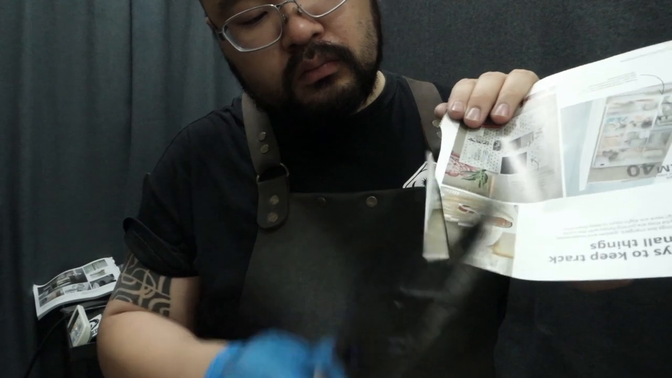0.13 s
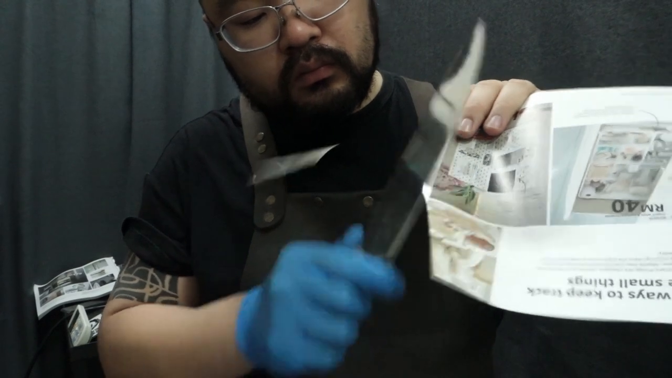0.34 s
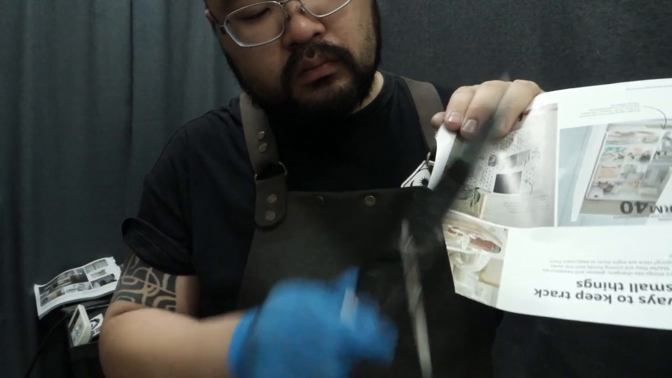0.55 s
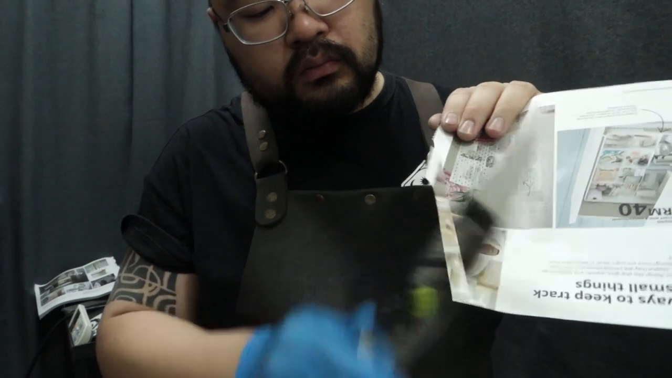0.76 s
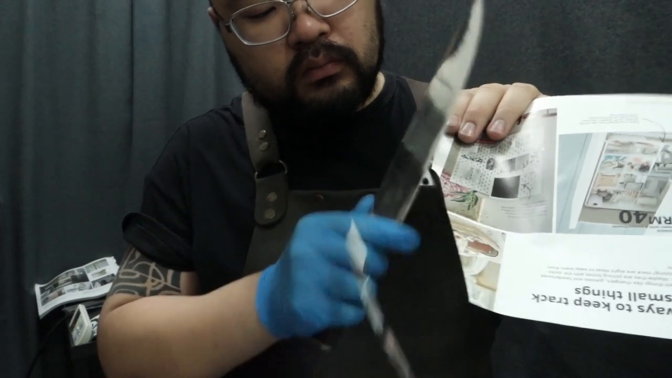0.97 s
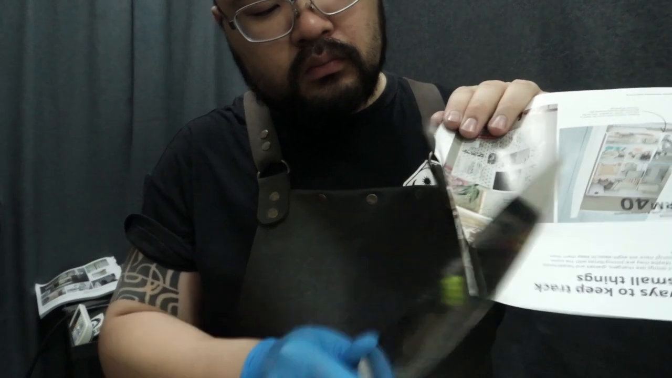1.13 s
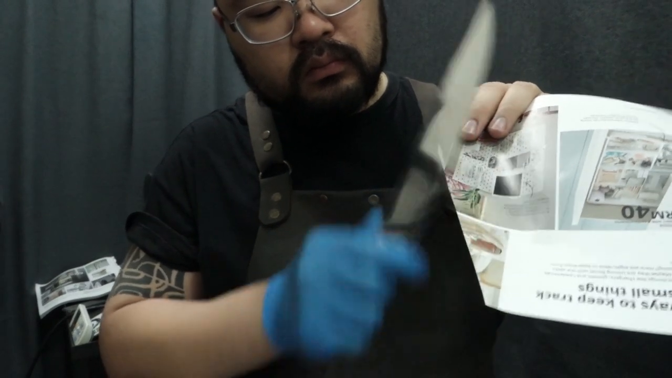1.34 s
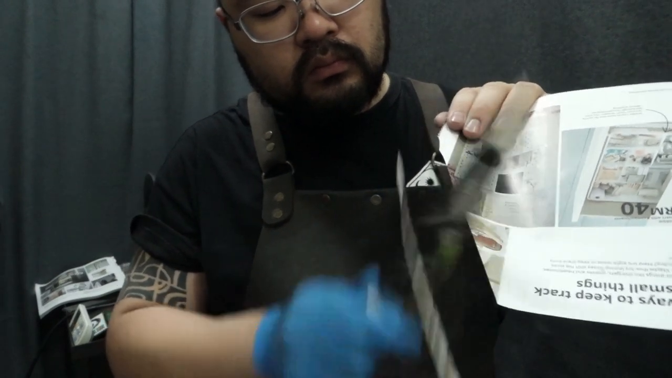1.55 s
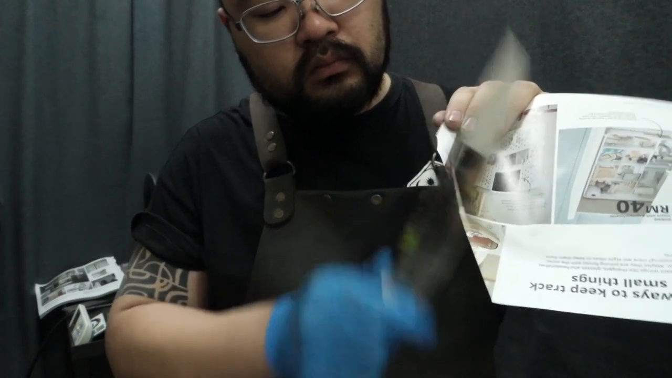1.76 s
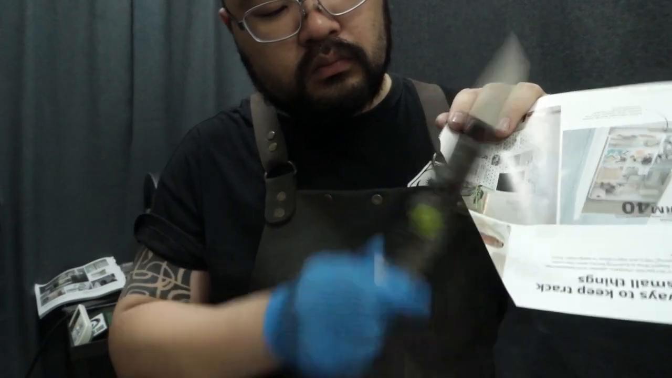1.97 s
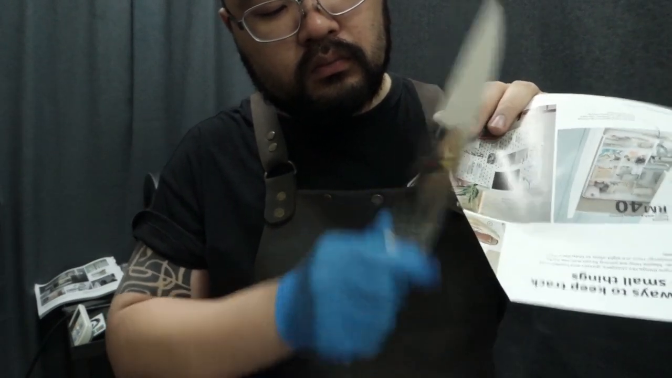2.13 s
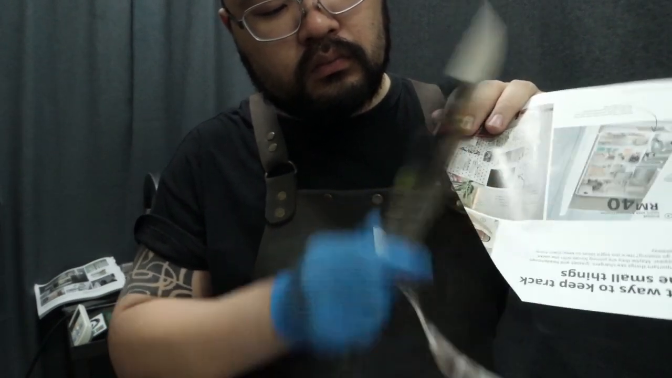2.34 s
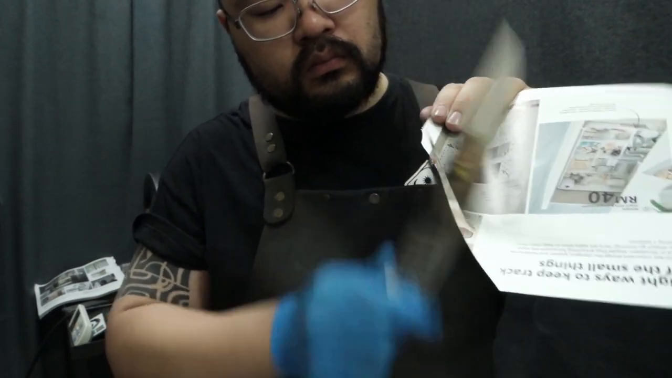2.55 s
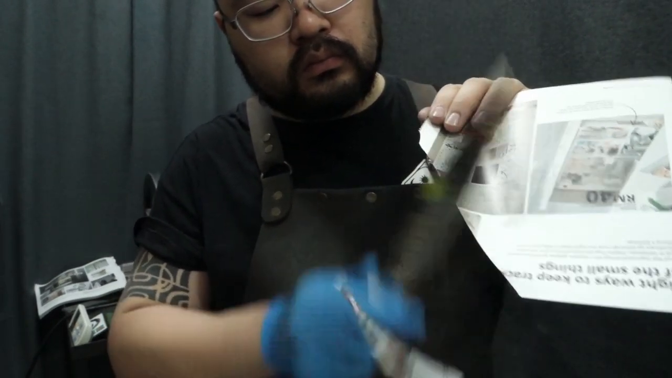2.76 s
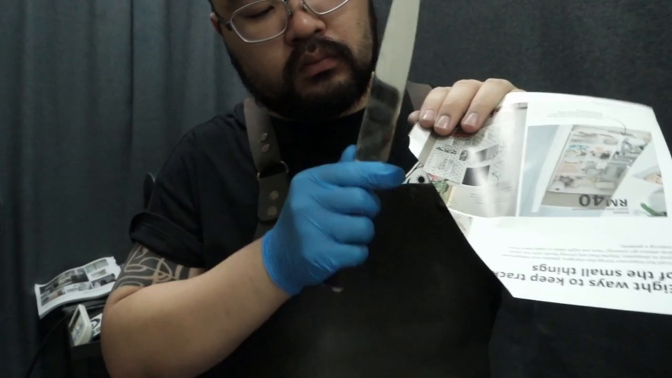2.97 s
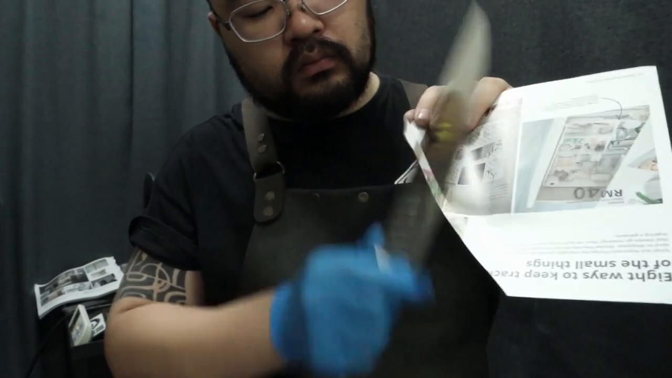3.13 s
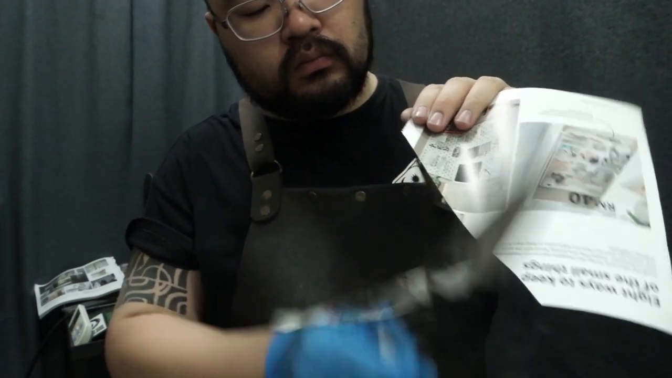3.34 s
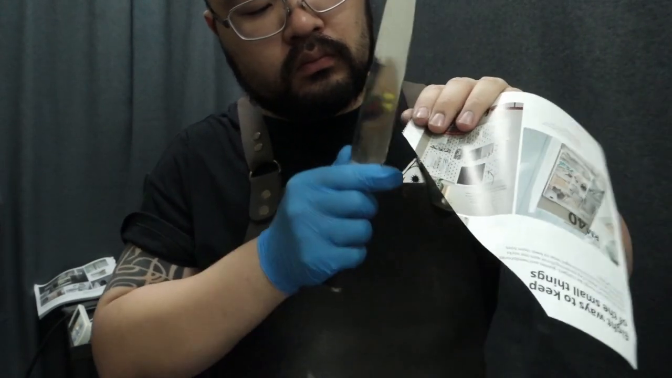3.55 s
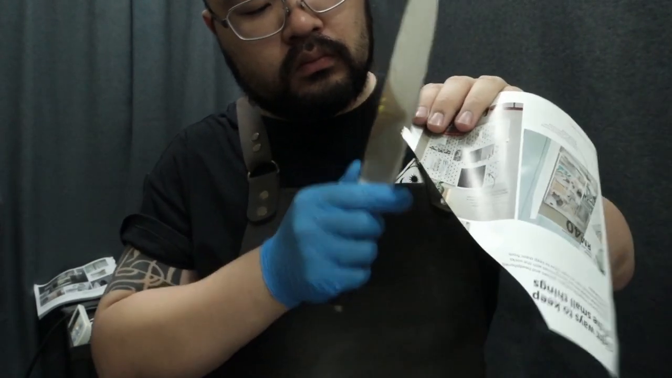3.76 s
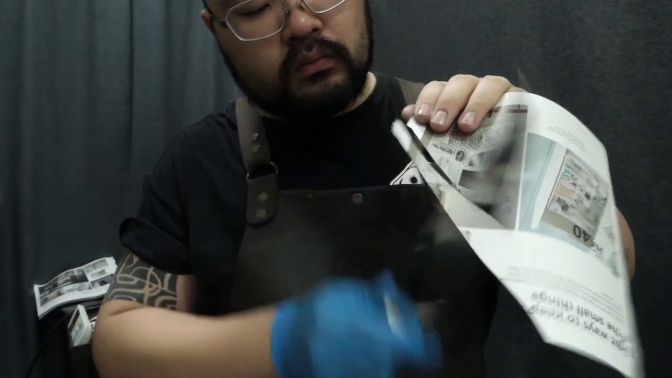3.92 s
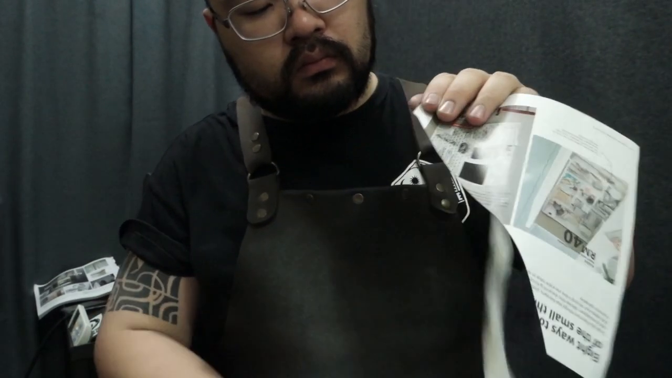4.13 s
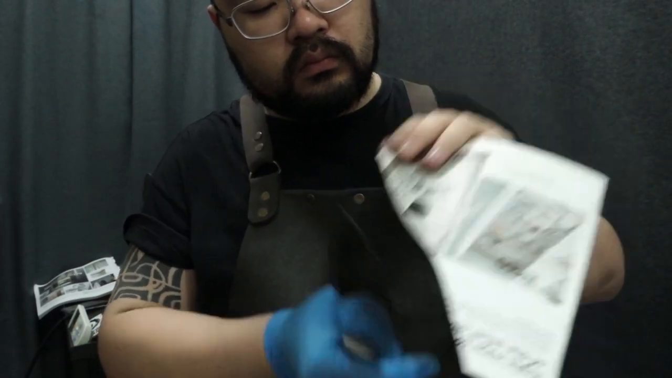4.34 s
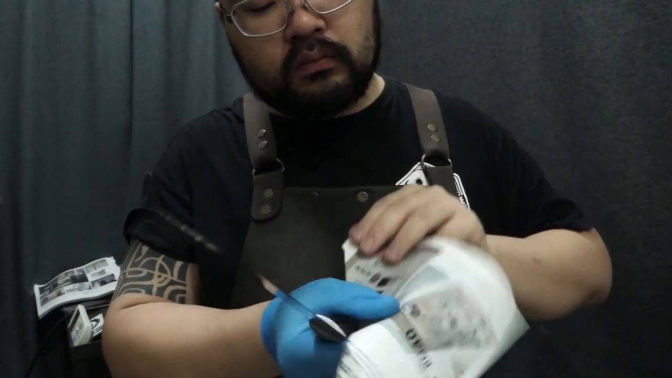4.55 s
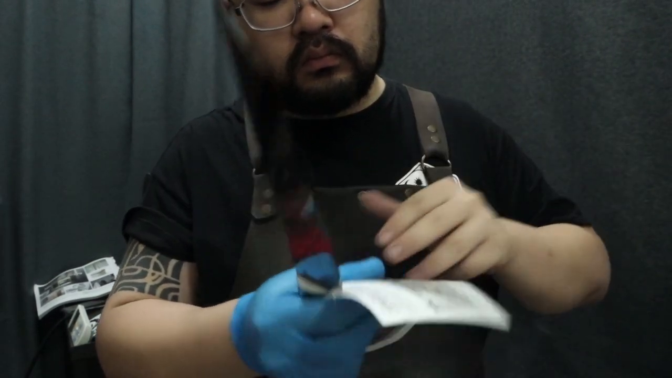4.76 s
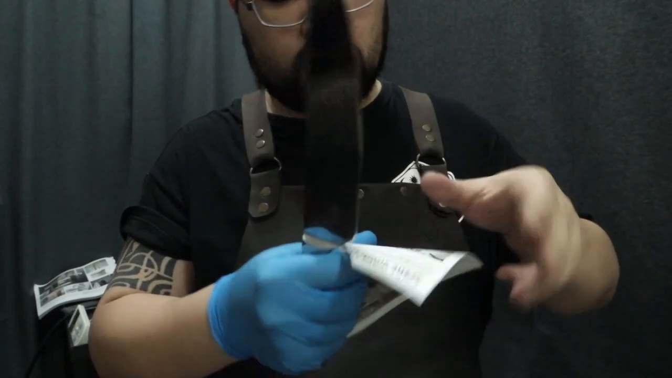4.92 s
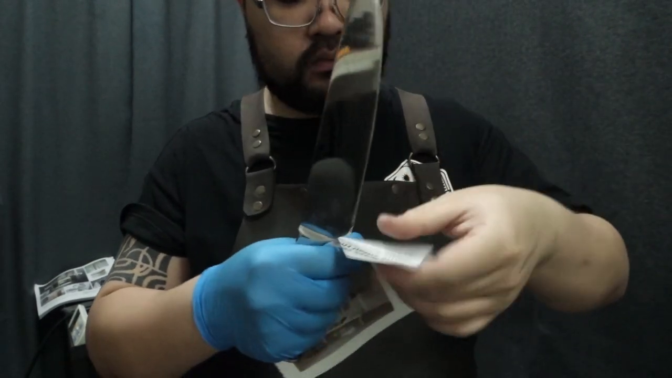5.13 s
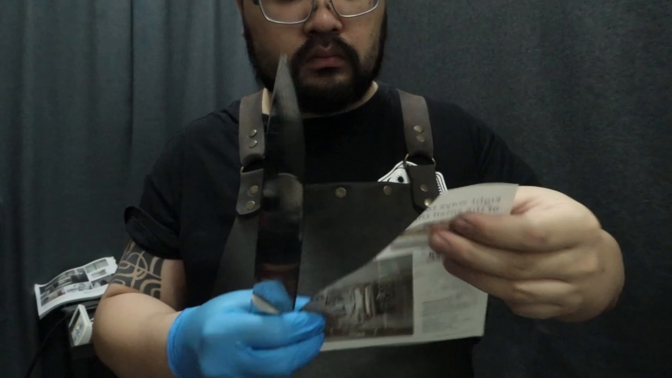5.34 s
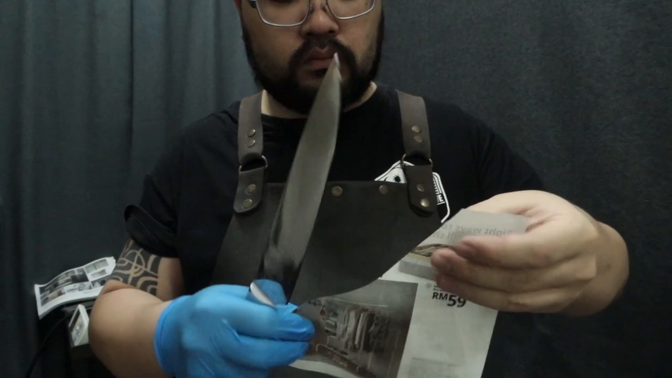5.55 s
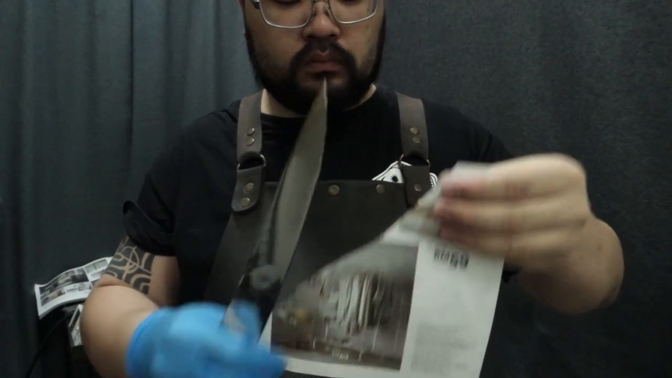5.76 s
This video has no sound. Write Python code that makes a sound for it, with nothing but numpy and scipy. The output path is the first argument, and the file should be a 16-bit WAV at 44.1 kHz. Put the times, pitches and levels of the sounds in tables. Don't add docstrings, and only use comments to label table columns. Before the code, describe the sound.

A small, fairly dry room with a soft, steady fan hum; a close stereo microphone hears the paper mainly from the right, duller on the left. From 0.07 s a sharp knife slices a hand-held newspaper sheet: short, dense, dry rips of about a tenth of a second at roughly 0.07, 0.4, 0.7, 1.0, 1.4, 1.75, 2.1 and 2.5 s, most with a small popping bite. A longer rip at 3.05 s starts with a strong pop; a brief high squeak and light ticks follow until 3.4 s. The last, longest slice, over a quarter second, comes at 3.75 s and ends hissy. Faint rustles and a tick occur near 4.1-4.3 s. Then hands crease and turn the sheet: sharp snaps at 4.5-4.65 s, the strongest at 4.86 s, more crackle and pops at 5.15-5.45 s, and soft rustling near 5.7 s, fading into fan noise.

```python
import sys
import numpy as np
from scipy import signal
from scipy.fft import rfft, irfft, next_fast_len
from scipy.io import wavfile
from scipy.ndimage import uniform_filter1d

SR = 44100
rng = np.random.default_rng(int(sys.argv[2]) if len(sys.argv) > 2 else 0)


def wav_record(signal):
    frames = np.transpose(np.atleast_2d(signal))
    bounded = np.clip(frames, -1, 1)
    quanta = np.round(bounded * 32767).astype(np.int16)
    wavfile.write(sys.argv[1], SR, quanta)


def volts_from_db(level):
    exponent = np.asarray(level, float) / 20
    return 10 ** exponent


N = 259749

# t/s, length/s, force level/dB, place of full force [0-1], first bite re full force/dB
STROKES = [
    (.066, 0.085, -26.5, 0.67, -10.5),
    (0.38, 0.091, -25, 0.56, -6.5),
    (.694, .124, -27, 0.4, -3),
    (1.022, 0.13, -27.5, 0.36, -10),
    (1.364, 0.13, -29, 0.74, -2),
    (1.745, 0.12, -27.5, .6, -5),
    (2.119, 0.12, -29, 0.28, -12),
    (2.519, .13, -29, 0.26, -6),
    (3.051, 0.19, -27, 0.36, -7.5),
    (3.746, 0.27, -24.5, 0.35, -7),
]
# treble level/dB on entry, halfway, on exit; strip f/Hz on entry, on exit
BLADE_LEANS = [(-3.5, -0.5, 1.5, 11500, 8300), (-3, -3, 1.5, 4900, 5400), (-3.5, -0.5, -0.5, 11700, 4400),
               (3.5, 0, -4, 8900, 4700), (1.5, 1, -3.5, 8400, 4900), (6, -1.5, -2.5, 6500, 5500),
               (6.5, 0.5, -0.5, 6600, 6400), (5, 2, -1, 7000, 6800), (-0.5, 1, 2.5, 6000, 7900),
               (-7, 1, -2.5, 5400, 7400)]
# resonance f/Hz, slackness/dB, final force re full/dB, extra edge hiss at the end/dB
SHEET_STATES = [(2230, -1, -7, -4.5), (2380, 0, -3.5, -3), (2300, 1, -5, -5), (2260, -0.5, -3.5, -4.5),
                (2180, 0.5, -2.5, -3), (2420, -0.5, -8.5, -2.5), (2250, -0.5, -3.5, 1),
                (2150, 0.5, -4, 3.5), (2380, -1, -9, 3.5), (2550, -3.5, -4, 1.5)]
# level/dB, width/octave
SHEET_RESONANCES = [
    (3.5, 0.34),
    (3, 0.26),
]
# f/Hz, level/dB
CUT_SPECTRUM = [(120, -69), (250, -12.5), (600, -12.5), (1000, -7.5), (1500, -5), (2000, -6.5),
                (2700, -5.5), (3400, -7), (4500, -6.5), (5700, -4.5), (7500, -6), (11000, -3.5)]
EDGE_HISS_DB = (-2, -6, 5.5)
SHEET_FLEX_DB = (-0.5, -10, -5.5, -11)
# f/Hz, level/dB, t60/s
BLADE_MODES = [(5600, -26, .3), (7700, -34, .2)]
# t/s, rise/s, fall/s, pressure level/dB, treble level/dB
TOUCHES = [(0.881, 0.028, .024, -65, 12.5), (1.27, 0.023, 0.025, -57, -22), (2.38, 0.046, 0.063, -61, -2),
           (4.9, 0.036, 0.18, -56, -20), (3.336, 0.0058, 0.059, -51, 2.5),
           (3.397, 0.0049, 0.034, -50, -0.5), (4.129, 0.016, 0.12, -57, 1.5), (4.262, 0.0082, .08, -48, 7),
           (4.4, 0.17, 0.0087, -51, -5), (4.518, 0.0085, 0.048, -40.5, -8.5),
           (4.545, 0.013, 0.091, -38.5, -8.5), (4.648, 0.01, 0.096, -43.5, -7), (4.659, .04, 0.29, -50, -5),
           (4.821, .012, 0.056, -55, -2), (4.862, 0.0056, .075, -38, -12), (5.137, .028, 0.21, -41.5, -8),
           (5.34, .07, 0.023, -46, -8.5), (5.418, 0.0068, 0.019, -45, -9),
           (5.44, 0.016, 0.035, -47.5, -11.5), (5.46, 0.11, 0.24, -56, -7.5), (5.6, .06, 0.11, -54.5, -4),
           (5.7, 0.025, 0.17, -46, -8.5), (5.201, .06, 0.34, -60.5, -0.5), (5.759, 0.033, .1, -63.5, 6.5)]
# f/Hz, level/dB
HANDLED_SPECTRUM = [(120, -42), (250, -9.5), (700, -1.5), (1300, -2), (2000, -3), (2800, -5), (3700, -10),
                    (5700, -5.5), (11000, -0.5)]
# t/s, peak level/dB, ring f/Hz, treble level/dB
BUCKLES = [(0.0679, -25, 2340, -19), (0.3868, -18, 2100, -18), (0.6875, -24, 2300, -28),
           (1.0246, -34, 2560, -5), (1.3666, -18.5, 1880, -15), (1.7462, -27, 2420, 1),
           (2.1263, -28, 2300, -8), (2.5151, -29.5, 2150, 3), (2.52, -37, 2090, 16),
           (3.054, -14.5, 2220, -15), (3.3403, -36, 2150, 7), (3.398, -31.5, 2330, -2),
           (3.748, -44, 2550, -32), (4.1595, -31, 2880, -18), (4.2594, -24.5, 2300, 6.5),
           (4.3632, -41, 1820, 6.5), (4.5167, -18.5, 2760, -9), (4.5504, -13.5, 2520, -20),
           (4.646, -18.5, 2820, -10), (4.8608, -11.5, 2280, -6.5), (5.1749, -21.5, 1840, -19),
           (5.4141, -17, 2180, -31), (5.449, -22, 2030, -32), (5.6745, -36, 1530, -16),
           (5.7195, -28, 1840, -21), (2.796, -51.5, 2400, 14.5), (5.651, -59, 2400, 8),
           (5.82, -58, 2400, 12), (4.541, -44, 2400, 2)]
# t/s, length/s, level/dB, f/Hz at the start, f/Hz at the end
SLIDES = [
    (2.868, .183, -57, 9950, 10200),
    (3.46, .07, -59, 10900, 9900),
    (3.185, .045, -34, 10500, 8000),
    (.655, .03, -60, 9800, 10100),
    (5.53, .04, -62, 8050, 8050),
]
# t/s, level/dB
AIR_PUSHES = [(1.03, -75), (1.37, -74), (1.75, -66), (3.75, -70), (3.89, -73), (4.26, -59), (4.54, -72),
              (4.64, -66), (4.86, -78)]
# f/Hz, level/dB
PORT_SHADE = [(500, -0.5), (1500, -5), (2600, -1.5), (3300, -7.5), (4500, -12.5), (5100, -9), (5500, -2),
              (6100, -10.5), (6600, -10.5), (7500, -7), (9000, -6), (11000, -9.5)]
# f/Hz, phase/rad
PORT_PHASE = [(0, 0), (1500, -.05), (2700, -.45), (3600, -1), (4200, -3.5), (5000, -6.2), (6400, -7.4),
              (11900, -8.2)]
# f/Hz, likeness [0-1]
PORT_COHERENCE = [(300, 0.63), (1200, 1), (2600, 0.91), (5500, 0.5), (11000, 0.47)]
# f/Hz, t60/s
ROOM_T60 = [(500, 0.58), (1500, 0.21), (3500, 0.31), (7000, 0.26), (11000, 0.22)]
# f/Hz, likeness [0-1]
ROOM_COHERENCE = [(300, 0.93), (1200, 0.77), (2600, 0.64), (5500, 0.084), (11000, 0.037)]
# f/Hz, level/dB
DIFFUSE_BALANCE = [(500, 0.25), (2000, 0), (3600, -5.5), (6500, -6.5), (11000, -6.5)]
# f/Hz, level/dB per Hz
FAN_SPECTRUM = [(24, -83), (40, -36), (115, -33), (160, -19), (261, -7.5), (363, -9), (399, -4.5),
                (608, -4.5), (717, -4.5), (865, -7.5), (1120, -6.5), (1550, -10.5), (2160, -9), (3000, -21),
                (10900, -25), (14200, -67), (22000, -120)]
# f/Hz, likeness [0-1]
FAN_COHERENCE = [(60, 0.63), (170, 0.95), (500, 0.96), (1420, 0.6), (4090, 0.13), (11700, 0.16)]
# f/Hz, width/Hz, level/dB
DUCT_RESONANCES = [(680, 55, 5), (2170, 120, 3), (2750, 250, 2.5)]

BITE_S, BITE_DB = 0.019, -4.5
SLIP_S, SLIP_SHARE = 0.021, 0.51
HISS_SHARE = 0.93
FLEX_PLACE = 0.73
SHEET_CLIMB = 0.06
JUDDER_DB, FIDGET_DB = 0.83, 1.6
TAUT_RING = 0.7
ONSET_DB, FADE_DB = -14.5, -20.5
FADE_TREBLE_DB = 2
TOUCH_HISS_DB, TOUCH_HISS_SHARE, TOUCH_FLEX_DB = -3, 1.43, -7.5
TURN_S = 4.45


def evened(x):
    return x / np.sqrt(np.mean(x ** 2) + 1e-20)


def read(points, hz):
    f, value = np.transpose(points)
    return np.interp(np.log(hz + 1), np.log(f + 1), value)


def add(mix, s, sound):
    part = mix[round(s * SR):][:len(sound)]
    part += sound[:len(part)]


def filtered(x, response):
    length = x.shape[-1]
    size = next_fast_len(length)
    return irfft(rfft(x, size) * response(np.fft.rfftfreq(size, 1 / SR)), size)[..., :length]


def stroke(start, length, force_db, place, entry_db, lean, sheet):
    sheet_hz, slack_db, exit_db, hiss_db = sheet
    u = np.linspace(0, 1, 21)
    arch_db = np.interp(u, [0, place, 1], [entry_db, 0, exit_db])
    arch_db = arch_db + JUDDER_DB * rng.standard_normal(len(u))
    bite_db = BITE_DB * np.clip(1 - u * length / BITE_S, 0, 1)
    slip_db = SLIP_SHARE * exit_db * np.clip(1 - (1 - u) * length / SLIP_S, 0, 1)
    level_db = force_db + arch_db + bite_db + slip_db
    treble_db = np.interp(u, [0, .5, 1], lean[:3])
    sizzle_db = HISS_SHARE * treble_db + np.interp(u, [0, .5, 1], EDGE_HISS_DB)
    sizzle_db = sizzle_db + hiss_db * np.clip(2 * u - .5, 0, 1)
    flex_db = np.interp(u, [0, FLEX_PLACE / 2, FLEX_PLACE, 1], SHEET_FLEX_DB) + slack_db
    sheet_pitch = sheet_hz * (1 + SHEET_CLIMB * (u - .5))
    strip_pitch = lean[3] + (lean[4] - lean[3]) * u
    return np.transpose([start + u * length, level_db, treble_db, sizzle_db, flex_db, sheet_pitch, strip_pitch])


def crackle(rows, colour, per_s, spread_db, patch_db, peaks=()):
    s, level_db, bright_db, sizzle_db, weight_db, *peak_hz = np.transpose(rows)
    t = np.arange(s[0], s[-1], 1 / SR)
    odds, sign, size = rng.random(len(t)), rng.standard_normal(len(t)), rng.exponential(1, len(t))
    fibres = (odds < per_s / SR) * sign * volts_from_db(spread_db * np.minimum(size, 4))

    hz, frame, z = signal.stft(fibres, SR, nperseg=256, noverlap=192)
    frame = frame + s[0]
    octave = np.log2(hz / 1000 + 1e-3)[:, None]
    patches = uniform_filter1d(rng.standard_normal(z.shape), size=4, axis=0)
    patches = evened(uniform_filter1d(patches, size=10, axis=1))
    field_db = read(colour, hz)[:, None] + patch_db * patches

    upper = np.clip((octave - 1.8) / 0.66, 0, 1)
    top = np.clip((octave - 2.75) / 0.64, 0, 1)
    body = np.clip((.8 - octave) / 1.0, 0, 1)
    field_db = field_db + (upper - top) * np.interp(frame, s, bright_db)
    field_db = field_db + top * np.interp(frame, s, sizzle_db)
    field_db = field_db + body * np.interp(frame, s, weight_db)
    for centre_hz, (peak_db, width) in zip(peak_hz, peaks):
        centre = np.log2(np.interp(frame, s, centre_hz) / 1000)
        field_db = field_db + peak_db * np.exp(-((octave - centre) / width) ** 2)

    sound = signal.istft(z * volts_from_db(field_db), SR, nperseg=256, noverlap=192)[1][:len(t)]
    edges = np.clip(np.minimum(t - s[0], s[-1] - t) / 0.0029, 0, 1)
    return s[0], sound / np.std(fibres) * volts_from_db(np.interp(t, s, level_db)) * edges


def blade(x):
    t = np.arange(SR // 2) / SR
    modes = np.zeros(len(t))
    for hz, db, t60 in BLADE_MODES:
        modes += volts_from_db(db - 60 * t / t60) * np.sin(2 * np.pi * hz * t) * np.sqrt(1 / (t60 * SR))
    return signal.oaconvolve(x, modes)[:N]


def snap(s, peak_db, hz, treble_db, rise_ms):
    t = np.arange(1500) / SR
    swell = np.exp(-((t * 1000 - 1.5 * rise_ms) / rise_ms) ** 2)
    ring = np.sin(2 * np.pi * hz * t * (.85 + 70 * t)) * swell
    grit = np.diff(rng.standard_normal((2, 1501)), axis=1)
    tick = evened(uniform_filter1d(grit[0], size=3)) * t / .0005 * np.exp(1 - t / .0005)
    shiver = evened(uniform_filter1d(uniform_filter1d(grit[1], size=7), size=5))
    shiver = shiver * np.exp(-t / 0.004) * np.clip(t / 0.0039, 0, 1)
    sound = ring + volts_from_db(treble_db + 2.0) * tick + volts_from_db(-8.5) * shiver
    return s - .0004, volts_from_db(peak_db - 4.5) * sound


def touch(start, rise, fall, pressure_db, treble_db):
    s = np.append(np.arange(0, rise, .008), rise + np.arange(0, 2 * fall, .008))
    fading = np.clip((s - rise) / fall, 0, 2)
    level_db = pressure_db + ONSET_DB * np.clip(1 - s / rise, 0, 1) + FADE_DB * fading
    level_db = level_db + FIDGET_DB * rng.standard_normal(100)[:len(s)]
    sizzle_db = TOUCH_HISS_DB + TOUCH_HISS_SHARE * treble_db + FADE_TREBLE_DB * fading
    return np.transpose([start + s, level_db, treble_db + 0 * s, sizzle_db, TOUCH_FLEX_DB + 0 * s])


def squeak(start, length, level_db, from_hz, to_hz):
    waver_hz, width_hz = 150, 130
    u = np.arange(0, length, 1 / SR) / length
    noise, drift = rng.standard_normal((2, len(u)))
    drift = evened(uniform_filter1d(uniform_filter1d(drift, size=300), size=300))
    hz = from_hz + (to_hz - from_hz) * u + waver_hz * drift
    r = np.exp(-np.pi * width_hz / SR)
    fuzz = evened(signal.lfilter([1], [1, -r], noise))
    whistle = fuzz * np.sin(2 * np.pi * np.cumsum(hz) / SR)
    return start, volts_from_db(level_db) * whistle * np.clip(20 * np.minimum(u, 1 - u), 0, 1)


def puffs():
    out = np.zeros(N)
    u = np.arange(4000) / SR / 0.0074
    for s, db in AIR_PUSHES:
        add(out, s, volts_from_db(db) * u * (2 - u) * np.exp(-u))
    return out


def rotated(x, turns_per_s):
    angle = 2 * np.pi * (turns_per_s * np.arange(N) / SR + np.arange(3)[:, None] / 3)
    return x * np.sqrt(2 / 3) * np.cos(angle)


def ports(x, sideways):
    smear = rng.standard_normal((3, 200)) * np.exp(-np.arange(200) / 40)
    smear = smear / np.linalg.norm(smear[0])
    scattered = signal.oaconvolve(rotated(x, 9), smear, axes=1)[:, :N].sum(0)

    def alike(hz):
        return np.clip(read(PORT_COHERENCE, hz), 0, 1)

    left = filtered(x, lambda hz: alike(hz) * np.exp(1j * np.interp(hz, *np.transpose(PORT_PHASE))))
    left = left + filtered(scattered, lambda hz: np.sqrt(1 - alike(hz) ** 2))
    return np.array([filtered(left, lambda hz: volts_from_db(sideways * read(PORT_SHADE, hz))), x])


def room(x):
    hz, t, z = signal.stft(rng.standard_normal((2, 3, SR // 2)), SR, nperseg=256)
    alike = np.clip(read(ROOM_COHERENCE, hz), 0, 1)[:, None]
    left = alike * z[1] + np.sqrt(1 - alike ** 2) * z[0]
    left = left * volts_from_db(read(DIFFUSE_BALANCE, hz))[:, None]
    decay = volts_from_db(-60 * t / read(ROOM_T60, hz)[:, None])
    tail = signal.istft(np.array([left, z[1]]) * decay, SR, nperseg=256)[1]
    tail = tail * np.clip((np.arange(tail.shape[-1]) / SR - .004) / .003, 0, 1)
    tail = tail / np.linalg.norm(tail[1, 0])
    return signal.fftconvolve(rotated(x, 6)[None], tail, axes=2)[..., :N].sum(1)


def fan():
    frames, hz = N // 256 + 5, np.fft.rfftfreq(1024, 1 / SR)
    a, b, c, d, patches = rng.standard_normal((frames, 513, 5)).T
    patches = evened(uniform_filter1d(uniform_filter1d(patches, size=10, axis=0), size=14, axis=1))
    alike = np.clip(read(FAN_COHERENCE, hz), -1, 1)[:, None]
    right = a + 1j * b
    left = alike * right + np.sqrt(1 - alike ** 2) * (c + 1j * d)
    left = left * volts_from_db(read(DIFFUSE_BALANCE, hz))[:, None]
    spectrum_db = read(FAN_SPECTRUM, hz)
    for centre_hz, width_hz, db in DUCT_RESONANCES:
        spectrum_db = spectrum_db + db * np.exp(-((hz - centre_hz) / width_hz) ** 2)
    z = np.array([left, right]) * volts_from_db(spectrum_db[:, None] + 1.6 * patches)
    noise = signal.istft(z, nperseg=1024, noverlap=768)[1][:, :N]
    return volts_from_db(-52) * evened(noise)


def scene():
    cut, handled = np.zeros(N), np.zeros(N)
    (ring_db, ring_width), strip = SHEET_RESONANCES
    for row, lean, sheet in zip(STROKES, BLADE_LEANS, SHEET_STATES):
        peaks = [(ring_db - TAUT_RING * sheet[1], ring_width), strip]
        control = stroke(*row, lean, sheet)
        add(cut, *crackle(control, CUT_SPECTRUM, 24000, spread_db=1.25, patch_db=1.6, peaks=peaks))
    for row in TOUCHES:
        add(handled, *crackle(touch(*row), HANDLED_SPECTRUM, 20000, spread_db=1.5, patch_db=2))
    cut, handled = volts_from_db(14.5) * cut, volts_from_db(16.5) * handled
    for row in BUCKLES:
        add(cut if row[0] < TURN_S else handled, *snap(*row, rise_ms=0.79))
    for row in SLIDES:
        add(cut, *squeak(*row))
    no_bass = signal.butter(2, 450, "high", fs=SR, output="sos")
    cut, handled = signal.sosfilt(no_bass, [cut, handled])
    direct = ports(cut + blade(cut), sideways=1.05) + ports(handled, sideways=0.42)
    return direct + volts_from_db(-6.5) * room(cut + handled) + fan() + puffs()


def top_cut(x):
    return signal.sosfilt(signal.butter(12, 12340, fs=SR, output="sos"), x)


def record(dry):
    thin = signal.sosfilt(signal.butter(2, 30, "high", fs=SR, output="sos"), dry)
    low_pass = signal.firwin(2047, 11010, window=("kaiser", 9), fs=SR)
    limited = signal.oaconvolve(thin, low_pass[None], "same")
    return top_cut(limited)


dry = scene()
out = record(dry)
wav_record(out)
```